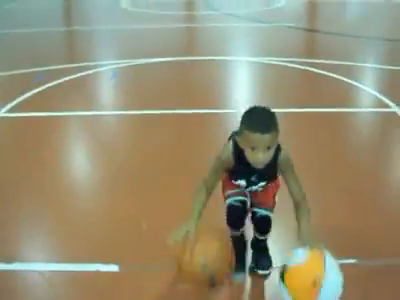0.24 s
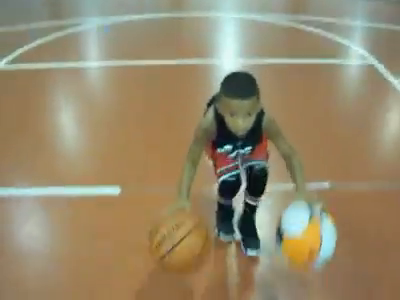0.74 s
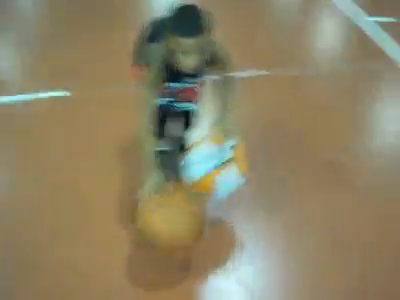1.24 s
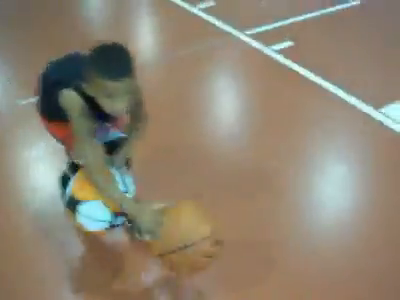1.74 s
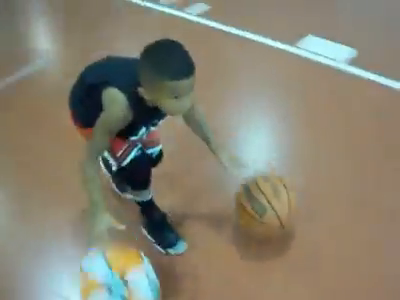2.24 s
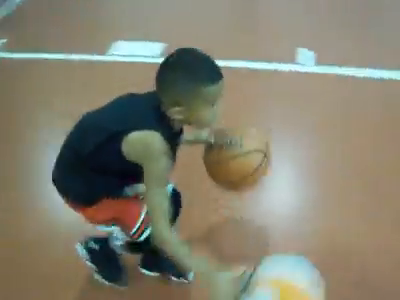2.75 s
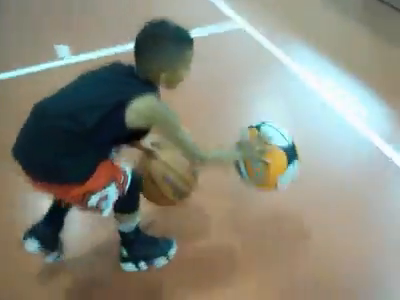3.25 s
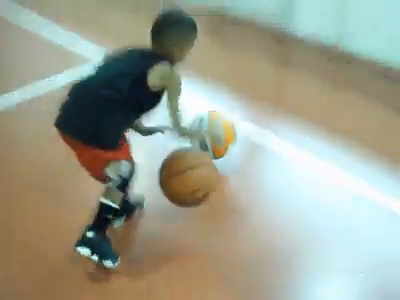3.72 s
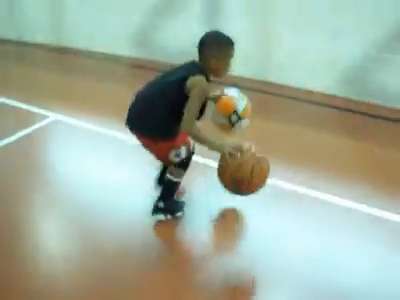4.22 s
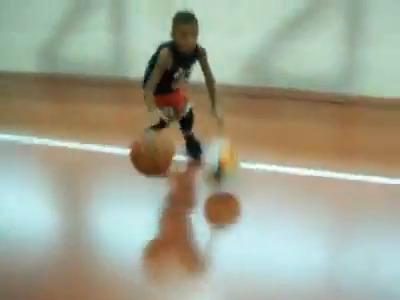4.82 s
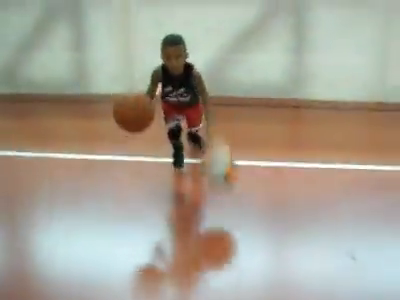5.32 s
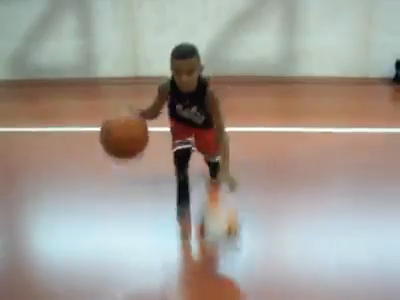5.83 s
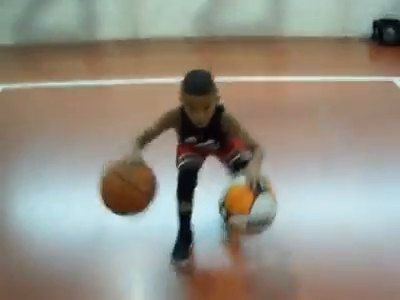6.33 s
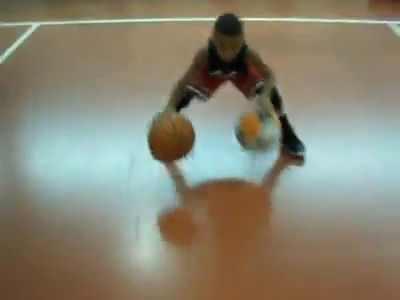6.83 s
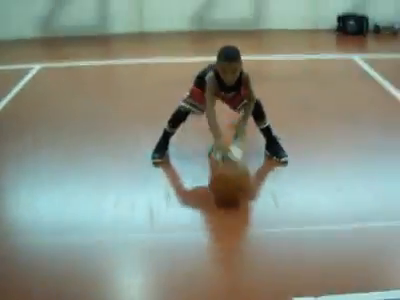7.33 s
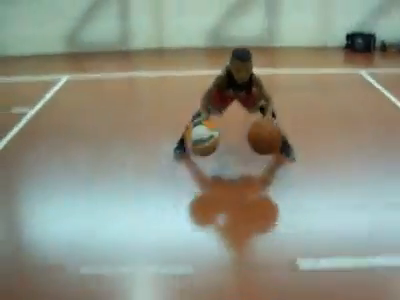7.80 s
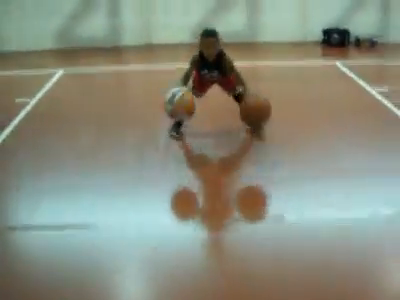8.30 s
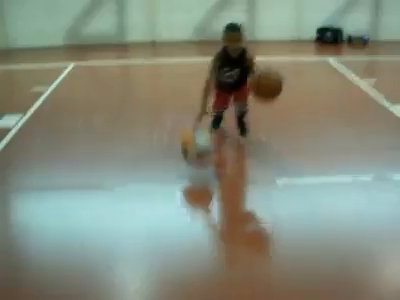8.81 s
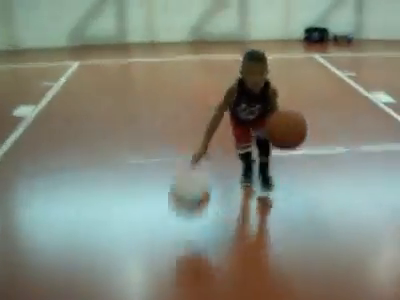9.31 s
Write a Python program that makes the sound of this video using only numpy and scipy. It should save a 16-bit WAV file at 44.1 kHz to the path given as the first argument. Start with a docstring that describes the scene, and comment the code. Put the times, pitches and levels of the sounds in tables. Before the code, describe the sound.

Two basketballs are dribbled on the wooden floor of a large gym, heard a few metres away through a small microphone with little treble. Each bounce is a thump with a rubbery slap, a brief ping and a slight hollow ring, followed by the hall's reverberation. For the first 4.5 seconds the balls land nearly together, about three double hits a second. From about 5 seconds they mostly alternate, roughly four bounces a second. They are loudest from 5.2 to 6.3 seconds, ease off, then grow strong again from 8.5 seconds until the end at about 9.5, the hardest slightly overloading the microphone. Light taps and knocks from hands and shoes fall in between. Soles scuff briefly around 1.4, 2.5, 5.3 and 6.4 seconds and squeak faintly near 0.2, 5.3 and 6.2 seconds. A low rumble and a soft wash of hall noise continue throughout.

```python
"""Two basketballs are dribbled on the wooden floor of a large gym, a few metres from a small microphone. Each
bounce is a thump of shell and boards, a brief ping, a ring of the air inside and a slap of skin. Short taps and
knocks come from hands, shoes and quick echoes or rebounds; soles scuff and squeak. The hall reverberates and
keeps a wash of sound; a lumpy low rumble lies beneath. The hardest bounces overload the microphone."""
import sys
import numpy as np
from scipy import signal
from scipy.fft import rfft, irfft
from scipy.io import wavfile

SR = 44100
rng = np.random.default_rng(int(sys.argv[2]) if len(sys.argv) > 2 else 0)


def dump_mix(stems):
    """Bounce the given channels to the path in sys.argv[1] as a 16-bit WAV at rate SR."""
    frames = np.atleast_2d(stems).T  # one column per channel
    limited = np.clip(frames, -1, 1)  # hard clip at full scale
    pcm = np.round(limited * 32767).astype(np.int16)
    wavfile.write(sys.argv[1], SR, pcm)


N = 421596
BLOW_TIME_S = np.arange(SR // 8) / SR
ATTACK_S = 0.01   # a blow's rms is set over this span


def from_db(db):
    """Decibels to gain."""
    return 10 ** (np.asarray(db) / 20)


def along(curve, time_s):
    """A curve's value at the given time."""
    return np.interp(time_s, *np.transpose(curve))


def unit_rms(x, span_s=None):
    """Scale to rms 1, over the first span_s if given."""
    head = x if span_s is None else x[:int(span_s * SR)]
    return x / np.sqrt(np.mean(head ** 2) + 1e-20)


def lowpass(x, cutoff_hz, order):
    """Butterworth low-pass."""
    return signal.sosfilt(signal.butter(order, cutoff_hz, fs=SR, output="sos"), x)


def wander(rate_hz):
    """Random drift, rms 1."""
    return unit_rms(lowpass(rng.standard_normal(N + SR), rate_hz, order=2)[SR:])


def coloured_noise(spectrum, size):
    """Noise with the given spectrum, rms 1."""
    hz, db = np.transpose(spectrum)
    bins_hz = np.maximum(np.fft.rfftfreq(size, 1 / SR), 1)
    gain = from_db(np.interp(np.log(bins_hz), np.log(hz), db, right=-120))
    return unit_rms(irfft(rfft(rng.standard_normal(size)) * gain, size))


def add(out, start_s, sound):
    """Mix a sound in at start_s."""
    i = max(int(round(start_s * SR)), 0)
    out[i:i + len(sound)] += sound[:max(N - i, 0)]


def struck(modes, scatter_db, detune, lag_s=0):
    """Damped sines; every blow lands on another spot, so strengths and pitches vary."""
    hz, db, t60_s = np.transpose(modes)[:, :, None]
    strength, shift = rng.standard_normal((2, len(modes), 1))
    t = np.maximum(BLOW_TIME_S - lag_s, 0)
    envelopes = from_db(db + scatter_db * strength - 60 * t / t60_s)
    return np.sum(envelopes * np.sin(2 * np.pi * hz * (1 + detune * shift) * t), 0)


def ping(hz, t60_s):
    """A contact rings briefly, at a pitch set by its sharpness."""
    decay = from_db(-60 * BLOW_TIME_S / t60_s)
    return unit_rms(np.sin(2 * np.pi * hz * BLOW_TIME_S) * decay, ATTACK_S)


def slap(spectrum, t60_s, rise_s):
    """A burst of noise as two surfaces meet."""
    envelope = from_db(-60 * BLOW_TIME_S / t60_s) * (1 - np.exp(-BLOW_TIME_S / rise_s))
    return unit_rms(coloured_noise(spectrum, len(BLOW_TIME_S)) * envelope, ATTACK_S)


# Background noise spectra. Each row: frequency in Hz, relative density in dB.
RUMBLE_SPECTRUM = [(15, -1.5), (27, 3.5), (48, 3), (70, 1.5), (110, -2.5), (160, -6), (230, -16),
                   (320, -23.5), (450, -22.5), (700, -35)]
WASH_SPECTRUM = [(300, -15), (600, -5), (800, 0.5), (1050, 1.5), (1400, 0.5), (1950, 0.5), (2600, -11.5),
                 (3500, -10.5), (4700, -19), (5500, -29), (6200, -22), (6900, -67.5)]
# Their levels over time. Each row: time in seconds, relative level in dB. The wash also rises briefly near 1.6
# s and 2.5 s, while soles drag.
RUMBLE_SWELL = [(0, -27.5), (2.8, -25.5), (3.8, -27), (4.6, -26.5), (6.6, -27.5), (8.3, -24.5), (9.56, -26)]
WASH_SWELL = [(0.0, -44), (1.38, -47), (1.57, -38.5), (2.39, -47), (2.55, -39), (3.35, -48), (3.8, -41),
              (4.85, -47.5), (5.3, -41.5), (6.47, -41.5), (7.24, -43), (9.56, -39)]


def background_noise():
    """A lumpy low rumble, and the gently swelling wash of a big hall."""
    t = np.arange(N) / SR
    rumble_db = along(RUMBLE_SWELL, t) + 2.0 * wander(rate_hz=8.9)
    rumble = from_db(rumble_db) * coloured_noise(RUMBLE_SPECTRUM, N)
    wash_db = along(WASH_SWELL, t) + 1 + 1.1 * wander(rate_hz=16.0)
    wash = from_db(wash_db) * coloured_noise(WASH_SPECTRUM, N)
    return rumble + wash


# What the hall returns. Each row: frequency in Hz, relative density in dB.
REVERB_SPECTRUM = [(60, -10), (200, -2.5), (450, -3), (1000, -7), (2000, -2), (4500, 6.5), (6500, 1.5)]


def hall_reverb(sound, t60_s=2.1, build_s=0.081, level_db=-17.0):
    """The tail from the far walls builds slowly and dies slowly."""
    t = np.arange(3 * SR) / SR
    envelope = from_db(-60 * t / t60_s) * (1 - np.exp(-(t / build_s) ** 2))
    tail = coloured_noise(REVERB_SPECTRUM, len(t)) * envelope
    return from_db(level_db) * signal.fftconvolve(sound, tail / np.linalg.norm(tail))[:N]


# Faint sole squeaks. Each row: start in seconds, length in seconds, pitch in Hz, level in dB.
SOLE_SQUEAKS = [(0.153, 0.25, 1890, -43), (5.303, 0.21, 2030, -45), (6.177, 0.095, 2000, -38)]


def squeaks(half_band_hz=85):
    """Rubber chatters on the varnish in a narrow, unsteady band."""
    out = np.zeros(N)
    for start_s, length_s, hz, db in SOLE_SQUEAKS:
        band = signal.butter(2, [hz - half_band_hz, hz + half_band_hz], "band", fs=SR, output="sos")
        chatter = unit_rms(signal.sosfilt(band, rng.standard_normal(SR)))
        swell = signal.windows.tukey(int(length_s * SR), 0.5)
        add(out, start_s, from_db(db) * chatter[:len(swell)] * swell)
    return out


# Dragged shoes. Each row: start in seconds, length in seconds, level in dB.
SOLE_DRAGS = [(1.442, 0.2, -34), (2.508, 0.14, -32), (5.288, .2, -34.5), (6.412, 0.078, -36)]
# Their friction. Each row: frequency in Hz, relative density in dB.
RUB_SPECTRUM = [(300, 3), (700, -8.5), (1300, -4), (2000, -9), (2800, -16), (4700, -16), (6200, -32),
                (7000, -44)]


def scuffs():
    """A dragged sole catches and lets go many times a second."""
    rub = unit_rms(coloured_noise(RUB_SPECTRUM, N) * from_db(1.1 * wander(rate_hz=48.0)))
    envelope = np.zeros(N)
    for start_s, length_s, db in SOLE_DRAGS:
        add(envelope, start_s, from_db(db) * signal.windows.tukey(int(length_s * SR), 0.5))
    return envelope * rub


# Short taps and knocks: hands, shoes, and quick echoes or rebounds just after a bounce.
# Each row: start in seconds, then thud, clap and smack in relative dB.
TAP_HITS = [(0.292, -25.5, -35.5, -52.5), (1.462, -45, -28.5, -42.5), (1.485, -30.5, -25.5, -38.5),
            (1.565, -44, -30, -41.5), (2.052, -31, -29, -39.5), (2.237, -37.5, -34.5, -44.5),
            (2.426, -33, -33.5, -53.5), (2.526, -37, -24, -57), (4.096, -28, -25, -38.5),
            (4.104, -31, -32, -33), (4.45, -39, -22.5, -28), (5.979, -29.5, -37, -35.5),
            (6.008, -39, -41.5, -51), (6.162, -28, -35, -46), (6.323, -35.5, -35.5, -35.5),
            (6.3729, -27, -41.5, -32), (6.6095, -35, -38, -40), (6.74, -29.5, -38.5, -33.5),
            (6.888, -33.5, -36.5, -38), (7.1432, -40, -26, -37.5), (7.3143, -36.5, -29, -57.5),
            (7.893, -36, -28.5, -45.5), (7.9982, -27.5, -25.5, -42), (8.189, -42, -42, -34),
            (8.321, -42, -34.5, -50), (8.54, -50, -35, -46), (8.7232, -45, -31, -54),
            (8.966, -31, -29.5, -39.5), (9.49, -48, -29.5, -42), (9.506, -32, -29, -54)]
# A tapped ball's dull note. Each row: frequency in Hz, relative level in dB, T60 in seconds.
THUD_MODES = [(254, 5.5, 0.075), (407, 4.5, 0.05)]
# A tap's hollow clap and sharp edge. Each row: frequency in Hz, relative density in dB.
CLAP_SPECTRUM = [(450, -11), (1000, 0), (1900, -2), (2600, -16), (4000, -25.5)]
SMACK_SPECTRUM = [(600, -9.5), (1300, 8.5), (2500, -7.5), (3500, 1.5), (5000, -2), (6300, -10.5),
                  (7200, -42)]


def taps():
    """Each short tap or knock is a dull note, a soft clap and a sharp smack."""
    out = np.zeros(N)
    for start_s, thud_db, clap_db, smack_db in TAP_HITS:
        note = struck(THUD_MODES, scatter_db=3.0, detune=0.07)
        thud = from_db(thud_db + 5.5) * unit_rms(note, ATTACK_S)
        clap = from_db(clap_db - 2.0) * slap(CLAP_SPECTRUM, t60_s=0.029, rise_s=0.0025)
        smack = from_db(smack_db + 3.0) * slap(SMACK_SPECTRUM, t60_s=0.013, rise_s=0.0015)
        add(out, start_s, thud + clap + smack)
    return out


def patter(rate_per_s=7.8, level_db=-46.0, spread_db=3.3):
    """Fainter touches of fingers and soles come at random moments."""
    touches = rng.random(N) < rate_per_s / SR
    strengths = from_db(level_db + spread_db * rng.standard_normal(N))
    clap = slap(CLAP_SPECTRUM, t60_s=0.08, rise_s=0.003)
    smack = from_db(-6.0) * slap(SMACK_SPECTRUM, t60_s=0.02, rise_s=0.0012)
    return signal.fftconvolve(touches * strengths, clap + smack)[:N]


# Return from a nearby surface as the player moves. Each row: time in seconds, gain in dB.
REFLECTION_GAIN = [(0, -18.5), (1.4, -9), (3.5, -11.5), (4.6, -4), (6.3, -18), (7.6, -1), (8.3, -24),
                   (9.56, -30.5)]


def reflection(bright, thump, start_s, smear_s=0.0015):
    """An uneven surface returns a bounce's bright part smeared, its thump weaker."""
    scatter = rng.standard_normal(len(BLOW_TIME_S)) * BLOW_TIME_S * np.exp(-BLOW_TIME_S / smear_s)
    smeared = signal.fftconvolve(bright, scatter)[:len(bright)]
    smeared *= np.linalg.norm(bright) / np.linalg.norm(smeared)
    return from_db(along(REFLECTION_GAIN, start_s)) * (smeared + from_db(-3.0) * thump)


# Hollow floor and air in the ball. Each row: frequency in Hz, relative level in dB, T60 in seconds.
FLOOR_MODES = [(300, -17.5, 0.24), (411, 2, 0.13), (446, 4, 0.11), (501, -10.5, 0.078)]
AIR_MODES = [(913, -1, 0.12), (1007, 0.5, 0.15), (1270, -1.5, 0.089), (1740, 1, 0.042), (1856, -0.5, 0.061),
             (2240, -5, 0.035)]
# Floor ring where the player stands. Each row: time in seconds, relative level in dB.
FLOOR_HOLLOWNESS = [(0, -15), (2.6, -8), (4.0, -12.5), (4.9, -18), (9.56, -24)]


def floor_and_air_ring(start_s, ping_hz, air_note_hz=1096, loss_db_per_octave=13):
    """Floor and enclosed air ring on after the thump; the higher the ping, the less the air rings."""
    floor = unit_rms(struck(FLOOR_MODES, scatter_db=3.0, detune=0.05, lag_s=0.004), ATTACK_S)
    air = unit_rms(struck(AIR_MODES, scatter_db=3.0, detune=0.025), ATTACK_S)
    air_db = -14 - loss_db_per_octave * np.log2(ping_hz / air_note_hz)
    return from_db(along(FLOOR_HOLLOWNESS, start_s)) * floor + from_db(air_db) * air


# Ball shell and floorboards. Each row: frequency in Hz, relative level in dB, T60 in seconds.
SHELL_MODES = [(194.8, 1.5, 0.043)]
BOARD_MODES = [(88.3, -1.5, 0.052)]


def shell_and_board_thump():
    """The shell flattens; the boards give way a moment later, so they start with suction."""
    shell = struck(SHELL_MODES, scatter_db=1.5, detune=0.08)
    boards = -struck(BOARD_MODES, scatter_db=1.0, detune=0.04, lag_s=0.0016)
    return unit_rms(shell + boards, ATTACK_S)


# Rubber on varnish. Each row: frequency in Hz, relative density in dB.
SKIN_SPECTRUM = [(600, -2), (1200, 9.5), (2400, 0.5), (3200, -12), (4900, -5), (5700, -20), (6500, -11.5),
                 (7200, -67)]


def skin_slap(spot, centre_hz=2707, scatter_octaves=0.34):
    """The pebbled skin cracks on the floor; the spot hit (-1 to 1) shifts its pitch."""
    tone = ping(centre_hz * 2 ** (scatter_octaves * spot), t60_s=0.01)
    crack = slap(SKIN_SPECTRUM, t60_s=0.022, rise_s=0.00051)
    return from_db(-4.0) * tone + from_db(4.5) * crack


# Ball on floor. Each row: start in seconds, thump in dB, ping in dB, ping pitch in Hz, slap in dB.
# Levels are relative within a column.
BALL_BOUNCES = [(0.0572, -12, -17, 1510, -30.5), (.112, -16, -33.5, 1650, -28.5),
                (0.4277, -15.5, -15, 1420, -39), (0.4363, -18, -31, 1650, -34.5),
                (0.7271, -12.5, -16.5, 1380, -39), (.754, -14.5, -21.5, 1606, -35),
                (1.0622, -14.5, -25, 1680, -34), (1.0822, -18.5, -16, 1720, -35.5),
                (1.3976, -13, -16, 1770, -34), (1.714, -12.5, -25, 1850, -28),
                (2.0214, -15, -26, 2000, -31.5), (2.3619, -14, -29, 1330, -29),
                (2.3893, -15, -20.5, 2140, -30.5), (2.6973, -18, -25.5, 1310, -31.5),
                (2.737, -12.5, -20.5, 1144, -29), (3.052, -12.5, -22.5, 1255, -31.5),
                (3.1009, -12, -18, 2310, -30.5), (3.4037, -18, -22, 1450, -36),
                (3.4569, -14, -21, 1600, -31), (3.74, -16.5, -15.5, 1430, -33),
                (3.7915, -13.5, -33, 990, -29.5), (4.087, -15.5, -21, 1210, -37.5),
                (4.114, -15, -21, 1026, -30), (4.431, -15, -32, 1040, -29), (4.8298, -15, -15, 1360, -27.5),
                (4.9447, -12.5, -20, 1040, -25.5), (5.1929, -9.5, -16, 1315, -28),
                (5.48, -7.5, -28, 1270, -22.5), (5.6892, -10, -12, 1320, -27),
                (5.9616, -6.5, -27, 1830, -23), (6.1423, -9.5, -18.5, 1410, -26.5),
                (6.3022, -6, -27.5, 1620, -21), (6.556, -9.5, -29, 1570, -32),
                (6.5877, -13, -17, 1500, -28.5), (6.8572, -14.5, -15, 1310, -29),
                (7.1589, -14, -18, 1510, -31), (7.446, -14, -22.5, 1160, -30.5),
                (7.7291, -15.5, -26, 1074, -35), (7.978, -13, -24, 1775, -27),
                (8.2013, -13, -19, 1310, -28.5), (8.2968, -14, -16.5, 1155, -29.5),
                (8.515, -10, -18, 1440, -23), (8.6955, -13, -14, 1190, -25.5),
                (8.9371, -7, -12.5, 1350, -24.5), (9.1944, -10, -15, 1240, -25),
                (9.4547, -7.5, -17, 1280, -20)]


def bounces(echo_delay_s=0.0102, echo_scatter_s=0.002):
    """Each impact thumps, rings, pings and slaps, then echoes off a nearby surface."""
    out = np.zeros(N)
    for start_s, thump_db, ping_db, ping_hz, slap_db in BALL_BOUNCES:
        spot, echo_path = rng.uniform(-1, 1, 2)
        thump = from_db(thump_db + 2.0) * shell_and_board_thump()
        ring = from_db(thump_db) * floor_and_air_ring(start_s, ping_hz)
        contact = from_db(ping_db - 3.97) * ping(ping_hz, t60_s=0.011)
        bright = contact + from_db(slap_db) * skin_slap(spot)
        add(out, start_s, thump + ring + bright)
        echo_s = start_s + echo_delay_s + echo_scatter_s * echo_path
        add(out, echo_s, reflection(bright, thump, start_s))
    return out


def scene():
    """Balls, hands and shoes in the hall."""
    play = bounces() + taps() + patter() + scuffs()
    return (play + hall_reverb(play) + squeaks() + background_noise())[None]


def record(dry):
    """The microphone passes little treble; its input flattens the highest peaks."""
    ceiling, hardness = 0.7, 20
    dull = lowpass(dry, cutoff_hz=6000, order=16)
    clipped = dull / (4.5 + np.abs(dull / ceiling) ** hardness) ** (1 / hardness)
    softened = lowpass(clipped, cutoff_hz=7000, order=2)
    return lowpass(softened, cutoff_hz=10500, order=12)


dry = scene()
out = record(dry)
dump_mix(out)
```